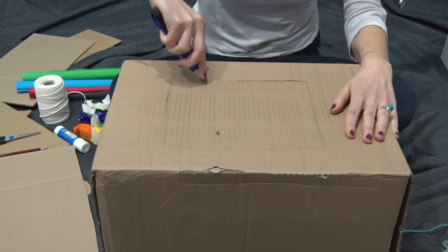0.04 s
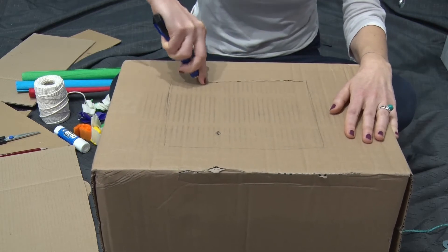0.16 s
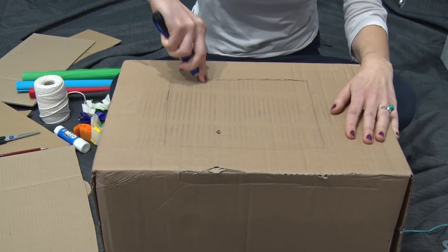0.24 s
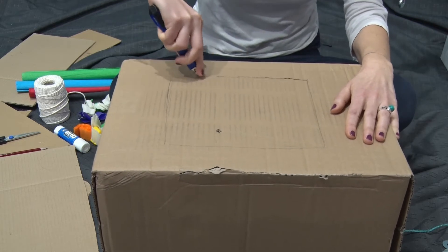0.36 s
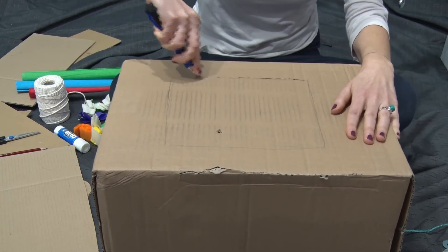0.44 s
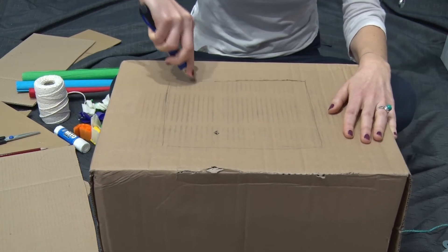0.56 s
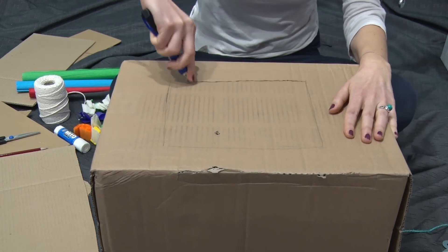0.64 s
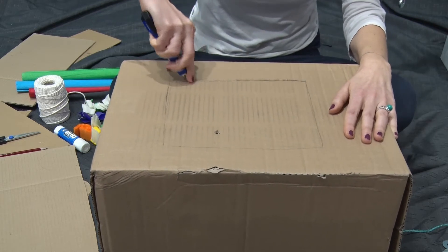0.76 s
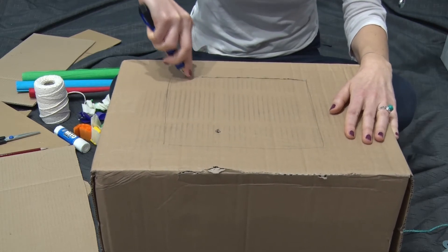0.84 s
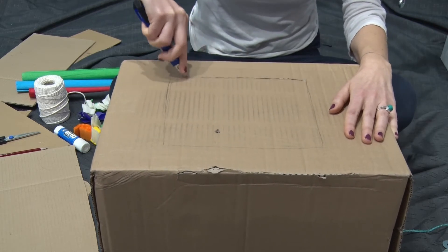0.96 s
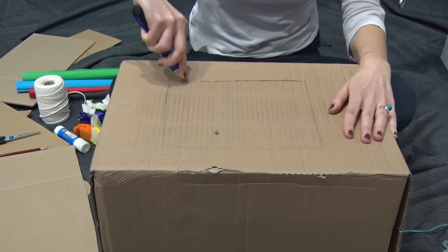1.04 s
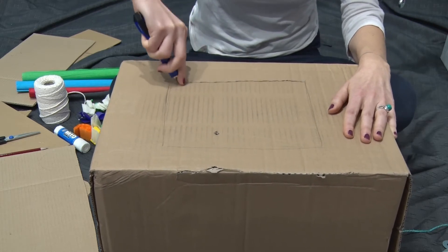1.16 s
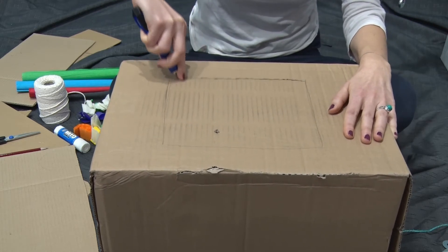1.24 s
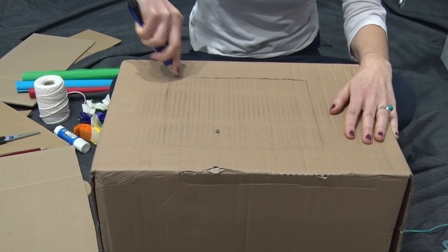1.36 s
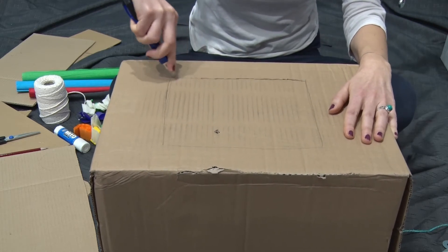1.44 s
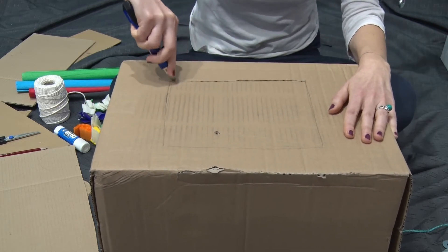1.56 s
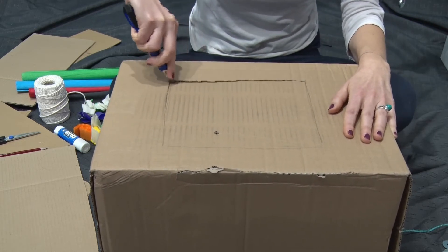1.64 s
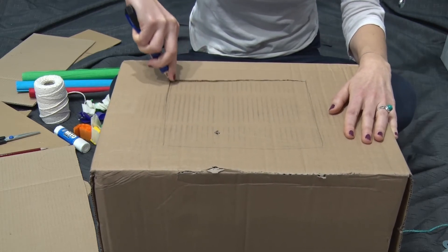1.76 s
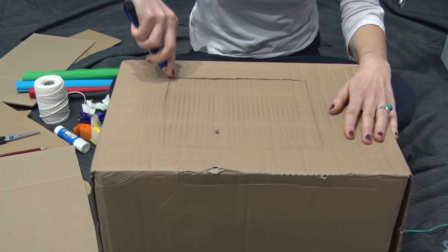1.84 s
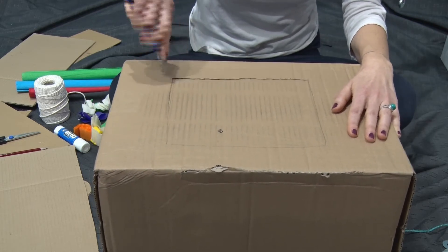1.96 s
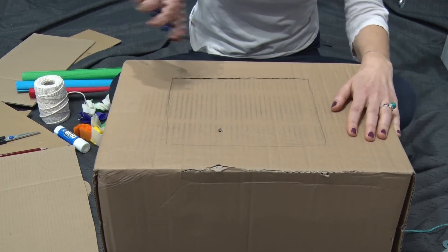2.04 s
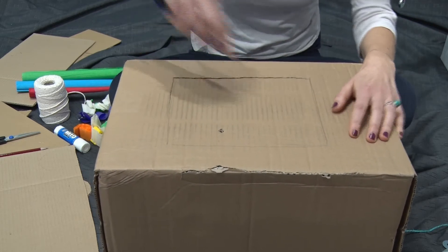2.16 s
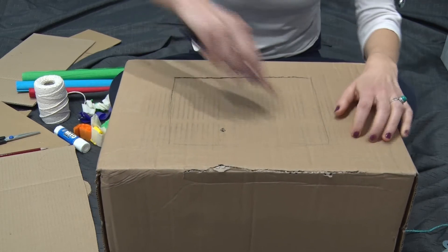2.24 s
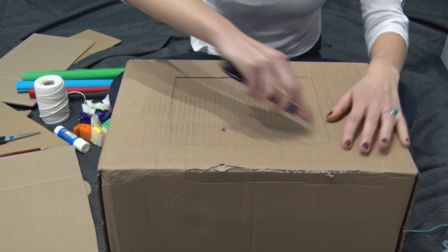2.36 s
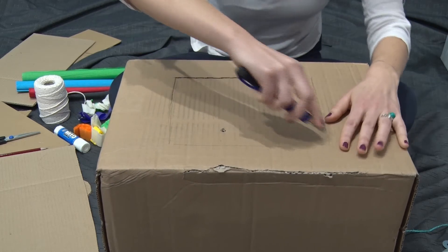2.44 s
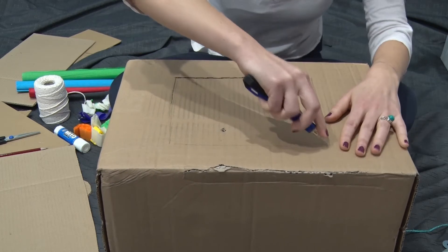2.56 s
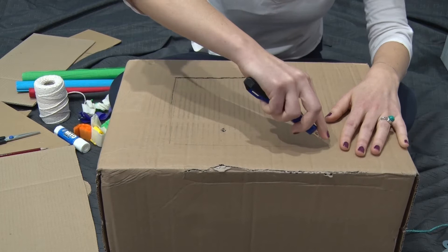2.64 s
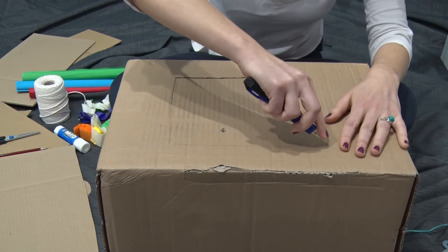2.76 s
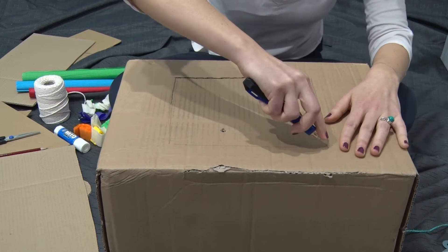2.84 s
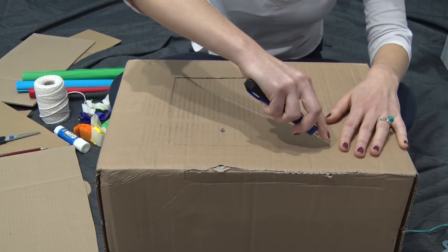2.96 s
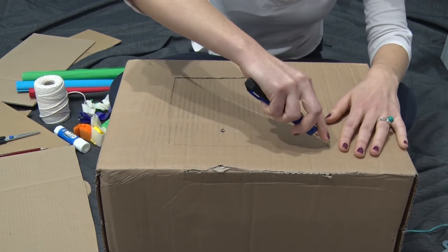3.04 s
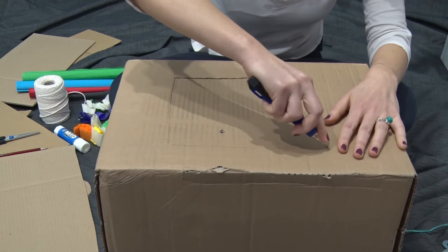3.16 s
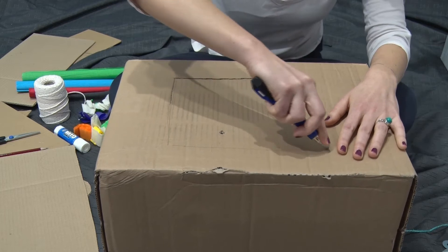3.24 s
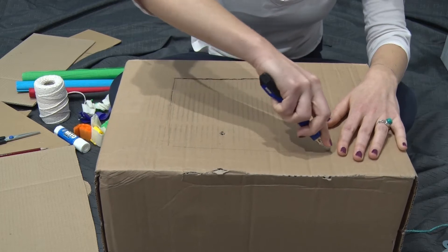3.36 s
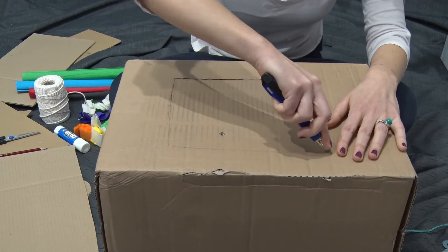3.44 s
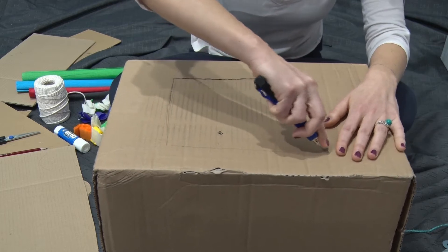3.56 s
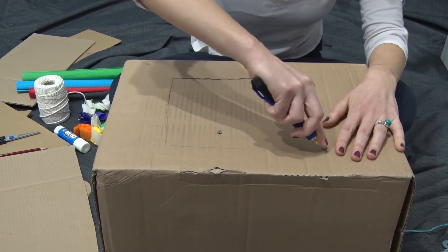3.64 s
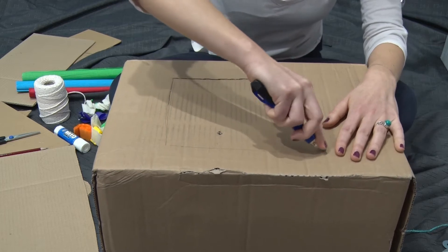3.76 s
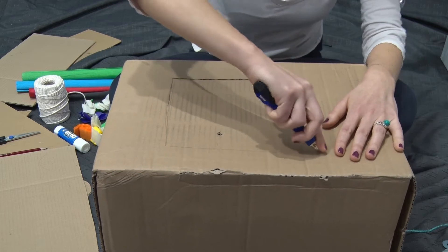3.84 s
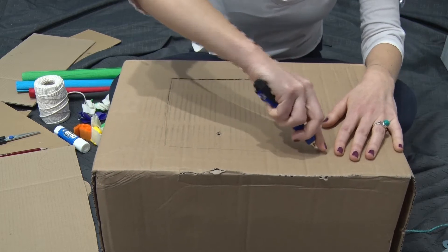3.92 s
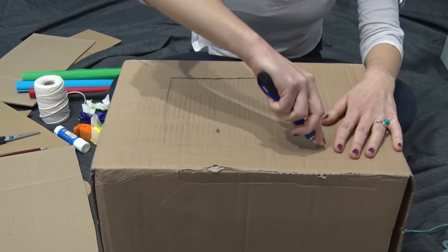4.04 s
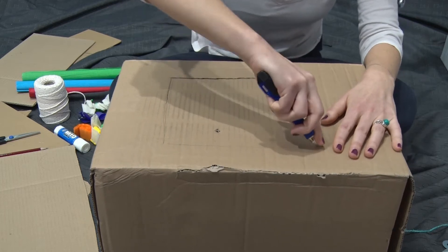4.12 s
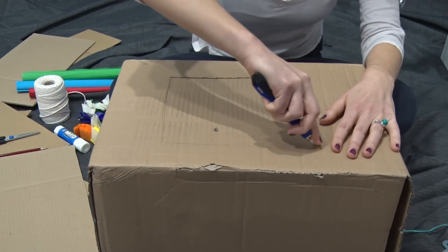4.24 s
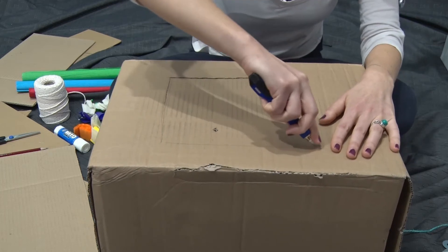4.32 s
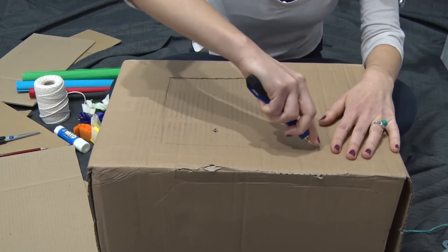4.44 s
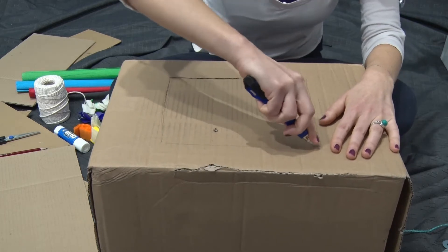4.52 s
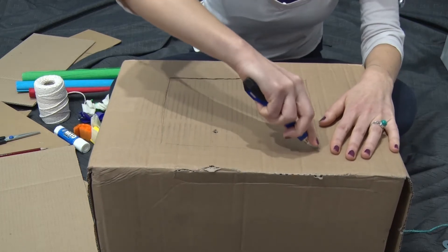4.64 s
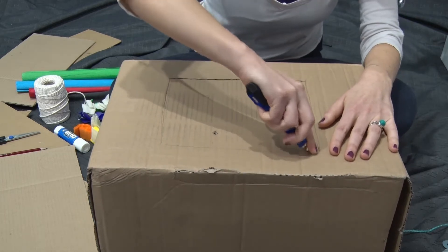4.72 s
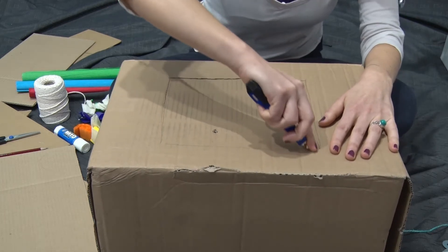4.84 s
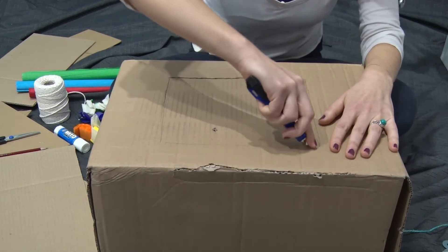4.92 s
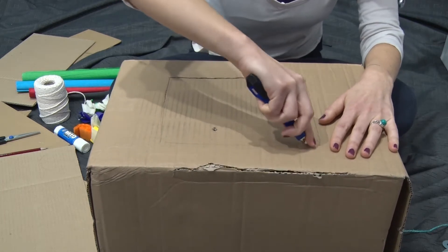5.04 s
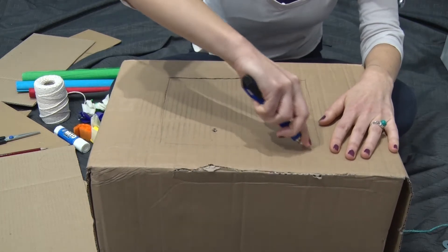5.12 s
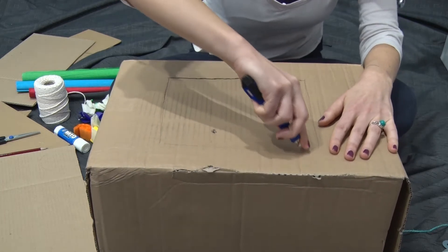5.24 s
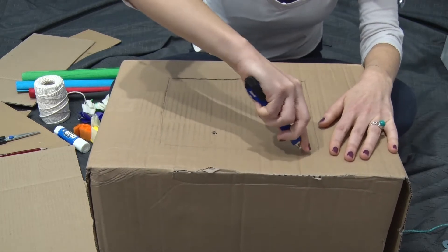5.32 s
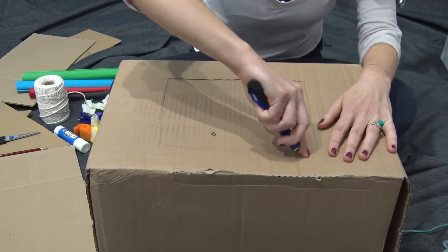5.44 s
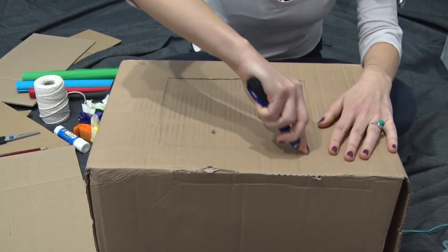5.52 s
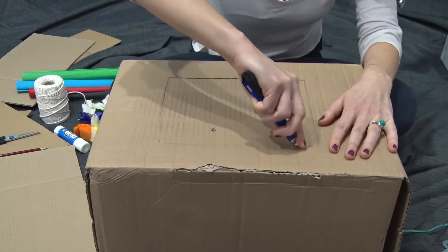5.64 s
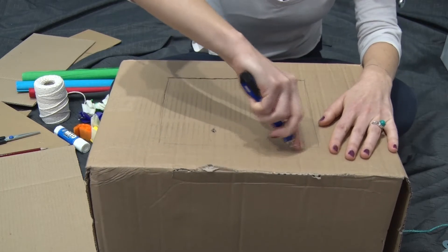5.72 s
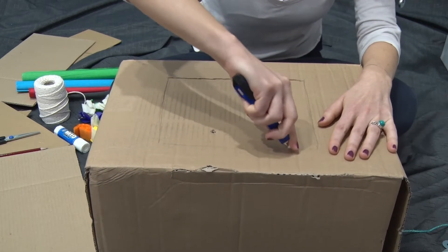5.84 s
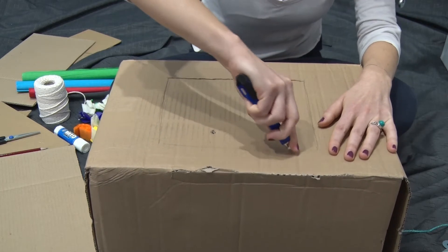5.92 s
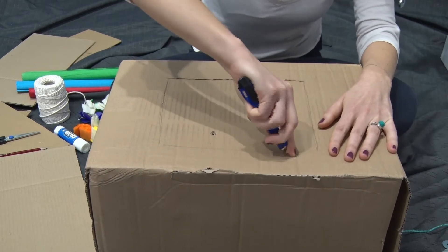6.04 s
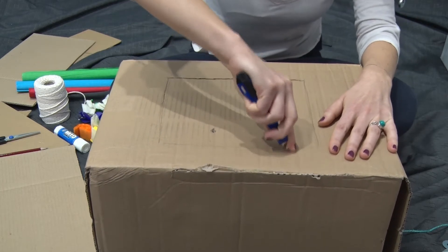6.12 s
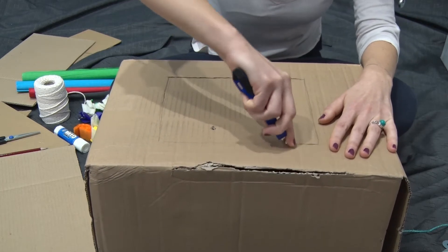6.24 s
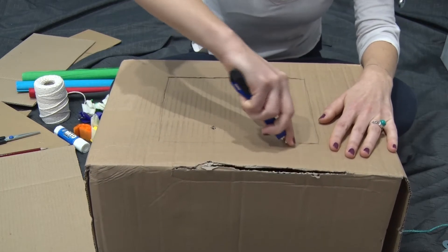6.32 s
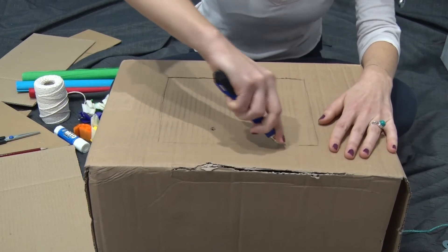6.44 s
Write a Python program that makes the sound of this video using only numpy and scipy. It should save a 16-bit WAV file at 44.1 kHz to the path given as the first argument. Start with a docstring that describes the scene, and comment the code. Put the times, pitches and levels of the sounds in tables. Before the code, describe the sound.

Quick rasping knife strokes and sharp cardboard pops drum a hollow box in a quiet room, first strong and rhythmic, then lighter and scratchier.

```python
"""In a quiet room, a blade saws through the lid of a corrugated cardboard box, first far corner, then near edge.
Strokes scrape and rips crack as random fibre noise and sharp jolts; these forces ring the modes of the
hollow box and the lid board, and hiss off the cut edge. Rips rock the whole box, and the knife's slider ticks.
A short room tail and steady room tone lie beneath; the microphone pair hears the box a little to the right."""
import sys
import numpy as np
from scipy import signal
from scipy.fft import rfft, irfft
from scipy.io import wavfile
from scipy.ndimage import uniform_filter1d

SR = 44100
rng = np.random.default_rng(int(sys.argv[2]) if len(sys.argv) > 2 else 0)


def unload_audio(sound):
    """Save the sound as a 16-bit wav file, at the path given as the first command line argument."""
    columns = np.transpose(np.atleast_2d(sound))
    # keep every value between -1 and 1, then stretch to whole-number steps
    steps = np.round(np.clip(columns, -1, 1) * 32767)
    wavfile.write(sys.argv[1], SR, steps.astype(np.int16))


N = 285759  # samples, about 6.5 s
MOVE_S = 2.5  # the hand goes to the near edge


def amp(db):
    """Decibels to gain."""
    return 10 ** (np.asarray(db) / 20)


def evened(x):
    """Scales to rms 1."""
    return x / np.sqrt(np.mean(x ** 2) + 1e-20)


def read(points, hz):
    """Reads a curve on a log-frequency axis."""
    f, value = np.transpose(points)
    return np.interp(np.log(hz + 1), np.log(f + 1), value)


def above(x, hz):
    """High-pass: small panels radiate little bass."""
    return signal.sosfilt(signal.butter(2, hz, "high", fs=SR, output="sos"), x)


def fibres(per_s, spread_db, crisp):
    """Snapping fibres of uneven size over a smooth rub; crisp is the snaps' share of the energy."""
    sizes = amp(spread_db * np.minimum(rng.exponential(1, N), 3.5))
    snaps = (rng.random(N) < per_s / SR) * sizes
    snaps = signal.lfilter([1], [1, -.9], snaps) * rng.standard_normal(N)  # -20 dB in half a millisecond
    crisp = np.clip(crisp, 0, 1)
    return np.sqrt(crisp) * evened(snaps) + np.sqrt(1 - crisp) * rng.standard_normal(N)


RISE_DB_PER_S, STOP_DB_PER_S = 591, 496  # how quickly a stroke sets in and stops
ARCH_DB = 1.5  # extra pressure in mid-stroke
HUM_DB = -2  # the hollow box hums under a stroke, re scrape
# strokes of the blade: (start [s], length [s], scrape at the start [dB], scrape at the end [dB],
# edge hiss [dB re scrape])
STROKES = [(0.01, 0.064, -57, -50, -9), (0.234, 0.055, -79, -50, -23), (0.335, 0.037, -47, -48, -8),
           (0.415, 0.092, -47, -41.5, -6.5), (0.6, 0.019, -49.5, -45, -6), (0.74, 0.059, -51, -66, -29),
           (0.857, 0.096, -43.5, -47, -5.5), (1.204, .09, -61, -56, -39), (1.314, 0.13, -42, -45.5, -7.5),
           (1.552, 0.0084, -59, -41.5, -9.5), (1.637, 0.087, -44, -45, -10),
           (1.842, 0.085, -46, -41.5, -8.5), (2.08, 0.13, -62.5, -57, -5.5), (2.258, 0.064, -57, -59, -8.5),
           (2.397, 0.041, -66.5, -65, -7), (2.766, 0.088, -72, -53, -19), (2.927, 0.076, -66, -74, -15),
           (3.171, 0.17, -60.5, -53.5, -7), (3.391, 0.093, -62, -58.5, -3.5),
           (3.551, 0.1, -61, -62.5, -5.5), (3.783, 0.081, -42.5, -55, -3.5),
           (3.997, 0.076, -54.5, -55.5, -5), (4.09, .07, -71, -71, -9), (4.196, 0.053, -57, -53.5, -7.5),
           (4.305, 0.082, -70, -50.5, -7.5), (4.525, 0.031, -55.5, -69, -12),
           (4.652, 0.059, -58.5, -44.5, -5.5), (4.85, 0.065, -51.5, -52, -6.5),
           (4.987, 0.072, -70, -64, -7), (5.101, 0.053, -50, -47.5, -6), (5.172, 0.058, -65, -61.5, -7.5),
           (5.236, 0.062, -66.5, -45.5, -3.5), (5.385, 0.082, -51, -62, 0.5),
           (5.542, 0.085, -50.5, -47.5, -7), (5.772, 0.019, -46.5, -51, -5), (5.876, 0.025, -48, -57, -4),
           (5.955, 0.068, -50, -49.5, 0), (6.091, 0.12, -57.5, -50.5, -5), (6.375, 0.08, -49.5, -45, -6.5)]


def rubbing():
    """Stroke forces on board, edge and box; the pressure wavers from flute to flute."""
    t, level = np.arange(0, N + 32, 32) / SR, 0
    for s, length, start_db, end_db, hiss_db in STROKES:
        edges_db = RISE_DB_PER_S * np.minimum(t - s, 0) - STOP_DB_PER_S * np.maximum(t - s - length, 0)
        arch_db = ARCH_DB * np.sin(np.pi * np.clip((t - s) / length, 0, 1))
        scrape_db = np.interp(t, [s, s + length], [start_db, end_db]) + arch_db + edges_db
        level = level + amp(scrape_db + [[0], [hiss_db]])
    scrape, hiss = (np.interp(np.arange(N) / SR, t, row) for row in level)
    waver = evened(uniform_filter1d(uniform_filter1d(rng.standard_normal(N), 300), 300))
    rub = fibres(per_s=350., spread_db=2.0, crisp=0.28) * amp(2.0 * waver)
    hum = amp(HUM_DB) * scrape * rng.standard_normal(N)
    return np.array([scrape * rub, hiss * rub, hum])


TEAR_FAR_S, TEAR_NEAR_S = 0.019, 0.011  # how long fibres tear after a crack
# rips where the blade breaks through a flute, levels before the trims in ripping():
# (time [s], crack [dB], hiss [dB re crack], drum [dB re crack], tearing [dB re crack])
RIPS = [(0.075, -31, -12.5, -6, -11), (0.09, -34.5, -13.5, 0, -3.5), (0.113, -20, -19, -4, -11.5),
        (0.121, -22, -14, -7, -8), (0.159, -20.5, -15.5, -1.5, -4), (0.178, -18.5, -15.5, -7.5, -20.5),
        (0.616, -28.5, -15, -2.5, -1), (0.659, -19, -15.5, -4, -10), (0.678, -30, -13, -4, -7.5),
        (0.695, -21, -14, -4, -8.5), (1.101, -20.5, -20, -5.5, -14), (1.112, -22.5, -13.5, -2, -7.5),
        (1.142, -26, -14, -0.5, -1.5), (1.162, -20, -12, -1.5, -19), (1.441, -33, -20, -0.5, -6),
        (1.466, -32, -13, -8, -11.5), (1.62, -27.5, -14.5, -5.5, -2), (1.658, -7.5, -18, 4, -14.5),
        (1.922, -25.5, -15, 10, -10.5), (2.184, -41, -23, -3, -2), (2.21, -50.5, -6, 11.5, -6.5),
        (2.757, -46, -36, -14.5, -3.5), (2.799, -38, -25, -9, -9), (3.19, -37, -30, -4, -6.5),
        (3.22, -53.5, 8.5, -8, -15), (3.265, -36, -16, -9, -5), (3.292, -35, -2.5, -11, -21),
        (3.324, -40, -4.5, 3, -11.5), (3.438, -41, -18, -21, -12), (3.76, -49, -16, -8, -3),
        (3.788, -24.5, -16.5, -9, -1), (4.228, -44, -3.5, -6, -15), (4.7, -29.5, -10, -5, -4),
        (4.722, -25.5, -7, -3, -8.5), (4.734, -23, -17, -6, -4.5), (4.77, -16.5, -13, -2.5, -9.5),
        (5.41, -12, -15.5, -9.5, -11.5), (5.437, -14, -13.5, -4, -11.5), (5.458, -45, 5, -1, -23),
        (5.749, -24, -11.5, -4, -7), (5.97, -38, -21, 1, 1.5), (5.995, -24.5, -10.5, -0.5, -3),
        (6.209, -33, -7.5, -17, -21), (6.389, -34.5, -13, -1.5, 3)]


def ripping():
    """Forces on board, edge and box: each rip swells briefly, cracks once, then tears and fades."""
    tear, out = fibres(per_s=500., spread_db=1.5, crisp=0.57), np.zeros((3, N))
    lead = 400  # samples of swell ahead of the crack
    t = (np.arange(3800) - lead) / SR
    after = np.maximum(t, 0)
    # the board gives way in a rounded jolt
    blow = 13.0 * after / 0.00018 * np.exp(-after / 0.00015) / (0.00018 * SR)
    swell = np.where(t < 0, amp(-11.5 + 1100.0 * t), 1)
    grits = rng.standard_normal((len(RIPS), len(t)))
    for (s, db, hiss_db, drum_db, tearing_db), grit in zip(RIPS, grits):
        at = round(s * SR) - lead
        length = TEAR_NEAR_S if s > MOVE_S else TEAR_FAR_S
        fade = 1 / (1 + np.exp(np.clip((t - length) / 0.0076, -50, 50)))
        shape = swell * amp(-4.0 * after / length) * fade
        tearing = amp(tearing_db + 2.5) * shape * tear[at:at + len(t)]
        # the crack's treble is a short spit
        spit = 1.51 * grit * np.clip(t / 0.0023, 0, 1) * np.exp(-after / 0.0012)
        force = np.array([tearing - blow, tearing + spit, tearing - blow])
        trims_db = np.array([[-3.0], [hiss_db + 3.5], [drum_db - 0.5]])
        out[:, at:at + len(t)] += amp(db + trims_db) * force
    return out


# after each push the lid keeps trembling, rows board, edge, box: (share of the energy [dB], t60 [s])
TREMBLE = [(-17, 1.5), (-20, 1.04), (-8.5, 1.64)]


def trembling(force):
    """A faint random force that follows the energy of earlier pushes and dies slowly."""
    out = []
    for push, (db, t60) in zip(force, TREMBLE):
        keep = amp(-2 * 60 / (t60 * SR))  # energy kept from sample to sample
        energy = signal.lfilter([1 - keep], [1, -keep], push ** 2)
        out.append(amp(db) * np.sqrt(energy) * rng.standard_normal(N))
    return np.array(out)


def ring(force, modes):
    """The force rings decaying sine modes, weighted by where the blade is."""
    t, near, out = np.arange(SR // 4) / SR, np.arange(N) / SR > MOVE_S, 0
    for place, here in ((1, ~near), (2, near)):
        h = sum(amp(m[place] - 60 * t / max(m[3], .004)) * np.sin(2 * np.pi * m[0] * t) for m in modes)
        out = out + signal.oaconvolve(force * here, h / np.linalg.norm(h))[:N]
    return out


def spread(x):
    """The colour drifts as the blade tilts and meets other fibres."""
    z = signal.stft(x, nperseg=128)[2]
    patches = rng.standard_normal(z.shape[::-1])
    patches = uniform_filter1d(uniform_filter1d(patches, 40, 0), 5, 1).T
    return signal.istft(z * amp(1.51 * evened(patches)), nperseg=128)[1][:N]


# modes of the hollow box, relative levels:
# (frequency [Hz], cut at the far corner [dB], cut at the near edge [dB], t60 [s])
BOX = [(148, -5.5, -0.5, 0.035), (194.4, 0.5, 4, 0.08), (232, 3.5, -7.5, 0.099), (287.6, -3, 1, 0.084),
       (342, 5.5, 5, 0.068), (392.5, -16.5, -7, 0.19), (440, -27, -49, 0.066)]


def hollow_box(force):
    """The force drums the low modes of the hollow box."""
    return above(ring(force, BOX), 155.0)


# modes of the lid board, relative levels:
# (frequency [Hz], cut at the far corner [dB], cut at the near edge [dB], t60 [s])
BOARD = [(705, -25, -1, 0.094), (780, 15, -6, 0.027), (882, -9.5, 11, 0.01), (978, 16.5, 3, 0.012),
         (1070, -7, 6.5, 0.017), (1247, 1.5, 7, 0.016), (1463, 4.5, 6, 0.0065), (1620, -16.5, 7, 0.0084),
         (1770, -7.5, -4.5, 0.033), (1970, -52, -86, 0.0085)]


def lid_board(force):
    """The force rings the short, higher modes of the board, with drifting colour."""
    return spread(above(ring(force, BOARD), 623.0))


def causal(points, size=1024):
    """Minimum-phase impulse with the given colour, energy 1."""
    colour_db = read(points, abs(np.fft.fftfreq(size, 1 / SR)))
    log_gain = np.log(amp(np.maximum(colour_db, -90)))
    h = np.fft.ifft(np.exp(np.conj(signal.hilbert(log_gain)))).real[:size // 2]
    return h / np.linalg.norm(h)


# colour of the hiss off the cut edge: (frequency [Hz], relative level per Hz [dB])
EDGE_COLOUR = [(1350, -4), (2300, 4), (3350, 2), (3830, -0.5), (4220, -1), (4720, -2), (6600, -4.5),
               (8120, 0.5), (9450, 0), (12700, -7), (15500, -13)]


def edge_hiss(force):
    """The fibre force hisses off the cut edge through a fixed colour that then drifts."""
    return spread(above(signal.oaconvolve(force, causal(EDGE_COLOUR))[:N], 2180.0))


ROCK_LIMIT = 0.028  # the box rocks no harder than its weight on the floor allows
# modes of the whole box rocking at each rip, relative levels:
# (frequency [Hz], cut at the far corner [dB], cut at the near edge [dB], t60 [s])
ROCK = [(55.3, 10, 6, 0.023), (80.5, -1.5, 3.5, 0.24), (120, 9, 6, 0.078)]


def rocking(drum):
    """The drum force of the rips, softly limited, rocks the whole box at its lowest modes."""
    limited = ROCK_LIMIT * np.tanh(drum / ROCK_LIMIT)
    return amp(-5.5) * above(ring(limited, ROCK), 49.0)


# modes of the knife handle: (frequency [Hz], level before the tick's tilt [dB], t60 [s])
HANDLE = [(407, -1.5, 0.013), (1860, 3, 0.019), (2660, -3.5, 0.015), (3500, -1, 0.004), (4830, -2, 0.0018),
          (7960, -2, 0.00076), (11800, -33, 0.0013)]
# ticks of the knife's loose slider: (time [s], level before trim [dB], brightness [dB per octave])
TICKS = [(2.293, -43.5, 4), (3.692, -33, 11.5), (5.253, -36, 6)]


def ticks():
    """Each slider tick is a two-millisecond rattle that rings the handle."""
    t, out = np.arange(2000) / SR, np.zeros(N)
    for (s, db, tilt_db), grit in zip(TICKS, rng.standard_normal((len(TICKS), 100))):
        h = 0
        for hz, level_db, t60 in HANDLE:
            mode_db = level_db + tilt_db * np.log2(hz / 3000) - 60 * t / t60
            h = h + amp(mode_db) * np.sin(2 * np.pi * hz * t)
        rattle = 0.28 * grit * np.hanning(100)
        rattle[0] = 1
        out[round(s * SR):][:len(t)] += amp(db - 7.0) * np.convolve(h, rattle)[:len(t)]
    return out


def room(x):
    """Sparse reflections of random sign that die away with a t60 of 0.079 s."""
    taps = np.zeros(SR // 2)
    at = np.arange(300, SR // 2 - 20, 20)
    taps[at + rng.integers(0, 20, len(at))] = rng.choice([-1., 1.], len(at))
    taps *= amp(-60 * np.arange(SR // 2) / SR / 0.079)
    taps = signal.lfilter([1], [1, -.8], taps)  # soft furnishings swallow the treble
    return signal.fftconvolve(x, taps / np.linalg.norm(taps))[:N]


# likeness of the two capsules: (frequency [Hz], left-right likeness [0 to 1])
SAME = [(60, 0.32), (240, 0.23), (950, 0.89), (3770, 0.77), (15000, 0.6)]


def apart(x):
    """The part of the sound that the capsules do not share, made by scrambling its phases."""
    hz, _, z = signal.stft(x, SR, nperseg=256)
    same = np.clip(read(SAME, hz), 0, 1)[:, None]
    phase = np.exp(2j * np.pi * rng.random(z.shape[::-1]).T)
    z = z * np.sqrt((1 - same) / (1 + same)) * phase
    return signal.istft(z, SR, nperseg=256)[1][:N]


AIR_DB = -67  # rms of the room tone ahead of record()
# colour of the room tone: (frequency [Hz], relative level [dB])
AIR = [(15, -20), (25, 6.5), (75, 3.5), (147, -14.5), (233, 3), (550, -8), (1530, -16), (2410, -25.5),
       (2680, -20.5), (15400, -28.5)]


def air():
    """Steady room tone: coloured noise, partly shared by the two capsules."""
    z = rfft(rng.standard_normal((3, N)))
    z = (z[0] + 0.49 * z[1:]) * amp(read(AIR, np.fft.rfftfreq(N, 1 / SR)))
    return amp(AIR_DB) * evened(irfft(z, N))


def scene():
    """Box, board, edge and knife sound together in the room."""
    rips = ripping()
    force = rubbing() + rips
    board, edge, box = force + trembling(force)
    sound = hollow_box(box) + lid_board(board) + edge_hiss(edge) + rocking(rips[2]) + ticks()
    sound = sound + amp(-21.0) * room(sound)
    unshared = above(apart(sound), 920.0)
    return np.array([sound + unshared, sound - unshared]) + air()


# lean of the microphone pair to the right: (frequency [Hz], left minus right [dB])
LEAN = [(60, -6), (240, -5.5), (950, -5.5), (3770, -4.5), (15000, -4)]


def record(dry):
    """Lowers the left capsule and raises the right by half the lean, then limits the band to 16 kHz."""
    lean = read(LEAN, np.fft.rfftfreq(N, 1 / SR)) / 2
    tilted = irfft(rfft(dry) * amp([lean, -lean]), N)
    low_pass = signal.firwin(511, 16000, window=("kaiser", 9), fs=SR)
    return signal.oaconvolve(tilted, low_pass[None], "same")


dry = scene()
out = record(dry)
unload_audio(out)
```